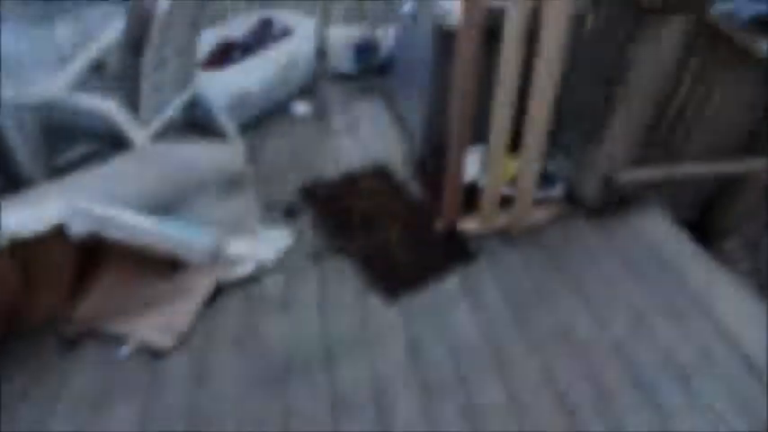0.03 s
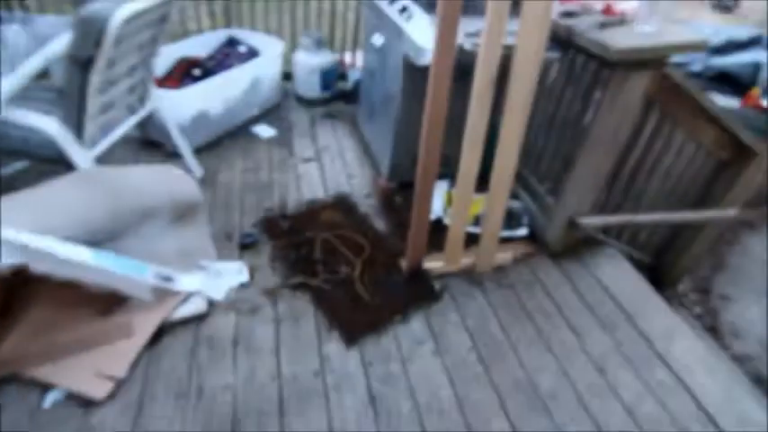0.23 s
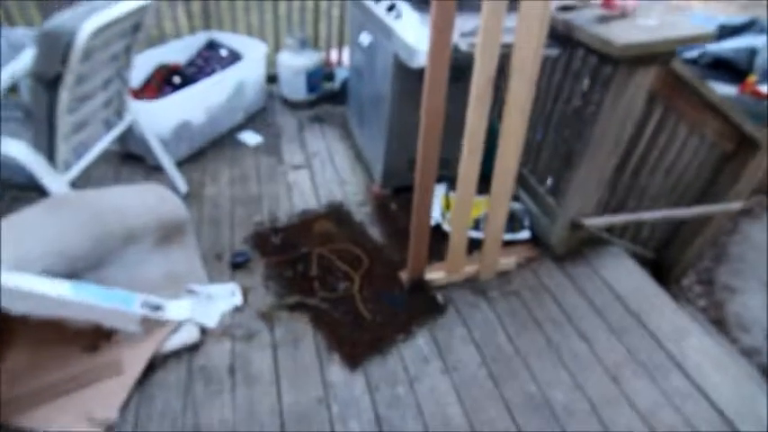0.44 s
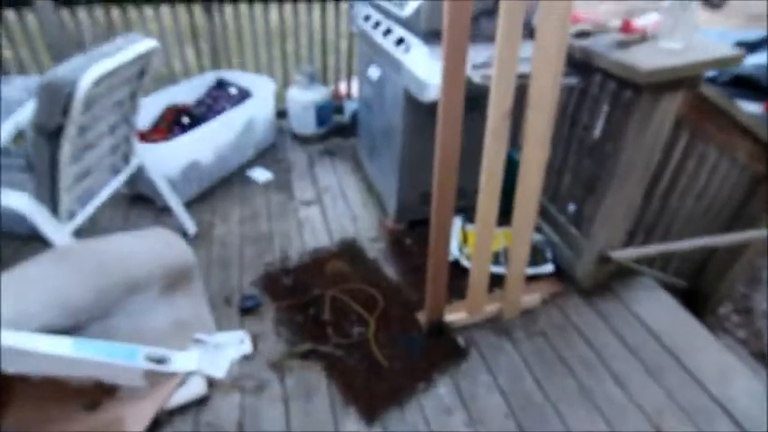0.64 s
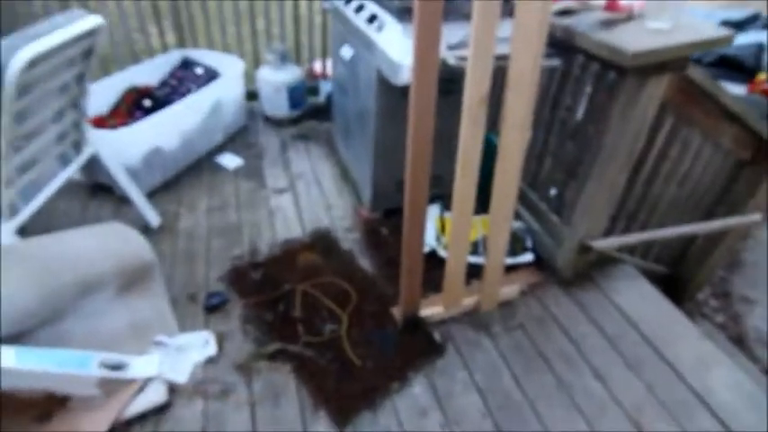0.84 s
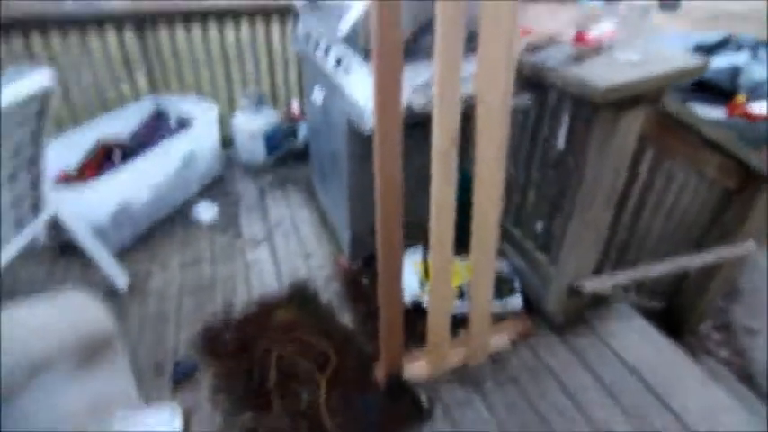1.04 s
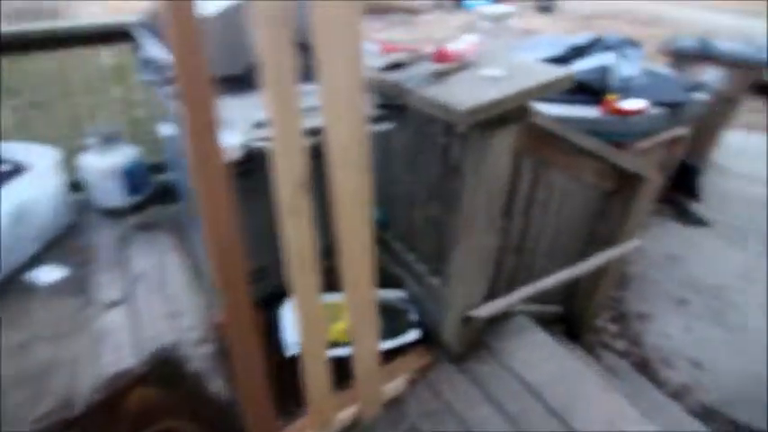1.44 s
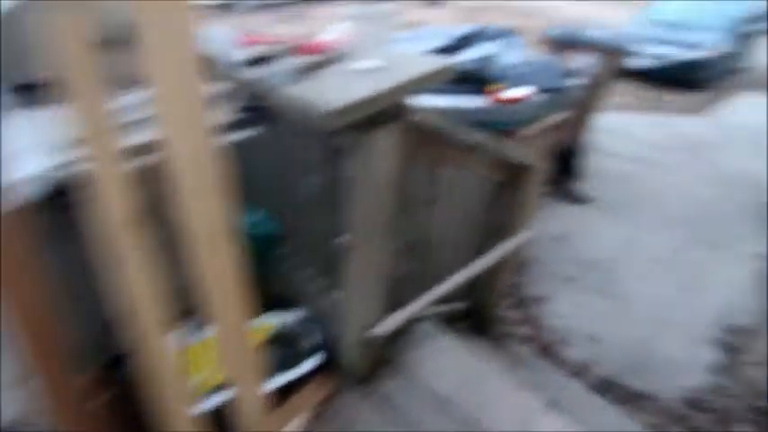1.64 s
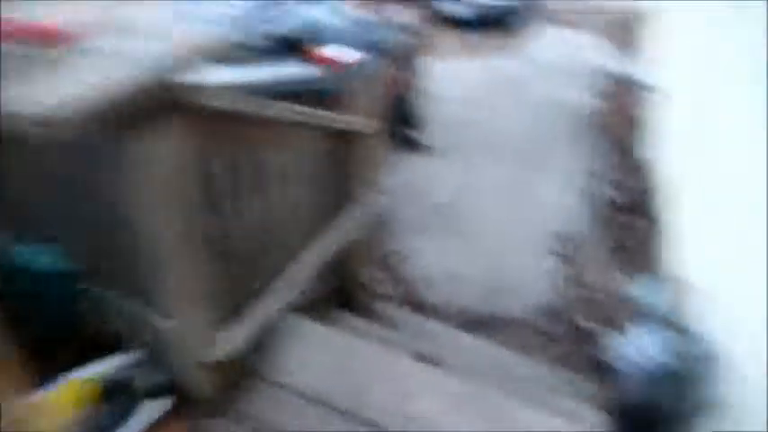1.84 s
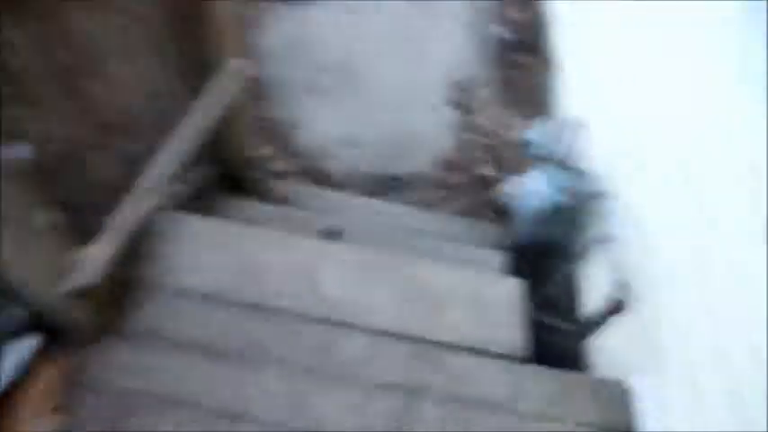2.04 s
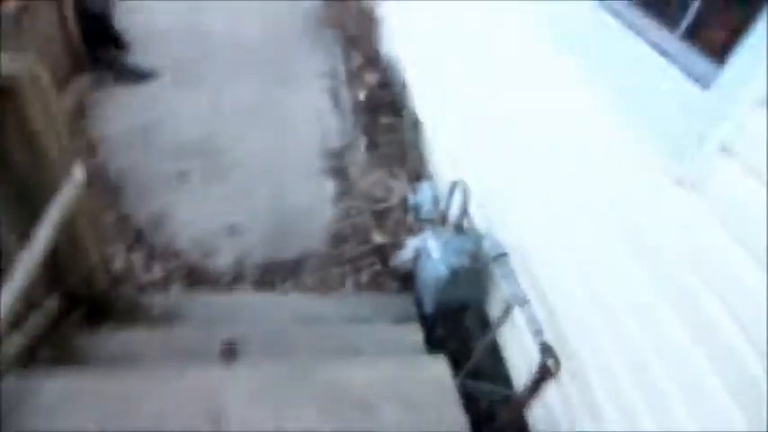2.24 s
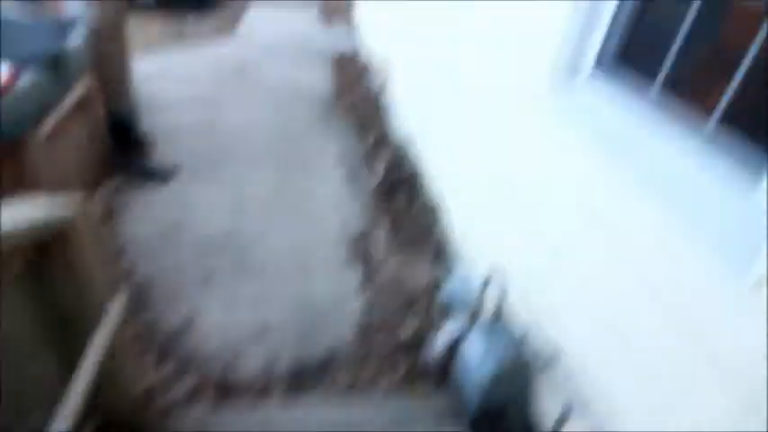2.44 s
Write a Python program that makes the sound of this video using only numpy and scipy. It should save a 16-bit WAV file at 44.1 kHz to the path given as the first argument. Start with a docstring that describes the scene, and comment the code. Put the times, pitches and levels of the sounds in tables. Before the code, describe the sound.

A gate's dry hinges squeal loudly, then it bangs shut as footsteps thud on wood.

```python
"""On an outdoor deck, a sprung wooden gate swings shut. Its dry hinges stick and slip, squealing against
each other, climbing in steps and then sinking in pitch until the gate slams on its post and rattles.
Feet thud on the boards, small things knock and clothing rustles close to the microphone,
all over a soft outdoor hush."""
import sys
import numpy as np
from scipy import signal
from scipy.fft import rfft, irfft
from scipy.io import wavfile

SR = 44100
rng = np.random.default_rng(int(sys.argv[2]) if len(sys.argv) > 2 else 0)


def store_pcm(level_fs):
    """Save levels as 16-bit WAV."""
    pcm = np.round(np.clip(level_fs, -1, 1) * 32767).astype(np.int16)
    wavfile.write(sys.argv[1], SR, np.atleast_2d(pcm).T)


N = 114660
T = np.arange(N) / SR
FREQS = np.arange(N // 2 + 1) * SR / N + 1
TOP_HZ = 15700
WAVER_HZ, SHIMMER_HZ = 43.7, 176  # slow and fast unevenness of a hinge's grip

# How unsteadily the hinges slip. Each row: time in seconds, roughness from 0 to 1.
ROUGHNESS = [(.3,0.4),(.38,0.24),(.54,0.24),(.6,0.59),(.72,0.47),(.85,0.19),(1.17,0.03),(1.22,0.67),(1.27,0.18),(1.34,0.72),(1.39,0)]
# The gate's wooden ring. Each row: pitch in Hz, relative level in dB, T60 in seconds before damping.
GATE_MODES = [(273,-8,0.074),(416,3,0.069),(703,3.5,0.055),(1118,-6,0.043),(1940,-7,0.029),(2500,-0.5,0.015),(3353,-9,0.1)]
# Edges in Hz of the boom, knock, clack and tick bands of a heavy blow.
BLOW_EDGES_HZ = [62, 200, 900, 3300, 7000]


def squeal(coupling_db=19):
    """Hinges and spring sing together and shake each other into sum and difference tones."""
    thin = thin_squeals()
    rich = main_hinge()
    low_cut = 1 / (1 + (2000 / FREQS) ** 4)
    coupled = irfft(rfft(rich * thin * curve(ROUGHNESS)) * low_cut, N)
    return place_squeal(rich + thin + amp(coupling_db) * coupled + creaks())


def main_hinge(tilt_db_per_khz=-3.2, pivot_khz=9.88):
    """The rich lead squeal of dry metal: three strong harmonics under a falling series of overtones."""
    # The climb, then the closing fall. Each row: time in seconds, pitch in Hz,
    # levels of harmonics 1, 2 and 3 in dB, overtone level at the pivot in dB.
    climbing = [(.3,1190,-25.5,-37,-55,-57),(.335,1223,-28.5,-36,-65,-59),(.36,1380,-28,-28,-20.5,-52),(.388,1417,-51.5,-29.5,-18.5,-47),(.435,1427,-35.5,-30,-26,-44.5),(.452,1512,-40,-32,-30,-45),(.5,1535,-43,-31,-27.5,-44),(.555,1595,-23,-23.5,-26.5,-42.5),(.585,1717,-27.5,-35.5,-44,-46),(.635,1763,-24.5,-31.5,-31,-48),(.69,1897,-41,-27,-38,-54),(.74,1873,-27,-27.5,-31.5,-48),(.778,1844,-35,-36,-34,-48),(.792,2105,-32.5,-22,-35.5,-45.5),(.87,2029,-34,-34,-37.5,-53),(.99,2044,-36.5,-56,-47,-55.5),(1.08,1966,-31,-27,-42.5,-50.5),(1.14,1939,-42,-37.5,-41,-56),(1.195,1981,-31,-33.5,-41,-49.5),(1.225,2123,-47,-64,-65,-62),(1.335,2104,-35.5,-43.5,-53,-53)]
    closing = [(1.349,1980,-25.5,-32,-39,-53),(1.365,1870,-32.5,-25,-31.5,-41),(1.41,1844,-37,-32,-43,-49.5),(1.44,1778,-24,-29.5,-28,-44.5),(1.505,1760,-37.5,-27,-34,-48),(1.55,1685,-31,-34,-32,-54.5),(1.61,1636,-37.5,-39.5,-52,-51),(1.648,1543,-43,-34.5,-28,-70)]
    out = 0
    for rows in (climbing, closing):
        khz = curve(rows) / 1000
        strong = [curve(rows, column) for column in (2, 3, 4)]
        overtones = [curve(rows, 5) + tilt_db_per_khz * (k * khz - pivot_khz) for k in range(4, 11)]
        out += stick_slip(rows, strong + overtones)
    return out


def thin_squeals(tilt_db_per_khz=-4.5):
    """Second hinge, pin and spring whistle: a strong fundamental with three fading harmonics above."""
    # Five squeals. Each row: time in seconds, pitch in Hz, levels of harmonics 1 and 2 in dB.
    second_hinge = [(.56,3154,-24,-29),(.59,2924,-26,-36),(.685,2876,-30,-43),(.72,3034,-26,-32.5),(.762,3064,-26,-35),(.785,3300,-28,-32)]
    second_high = [(.785,3690,-31,-36.5),(.87,3741,-31.5,-36),(.91,3600,-40.5,-56),(.93,3574,-22.5,-44),(1.02,3527,-18,-50),(1.16,3507,-27,-55),(1.21,3355,-24.5,-52),(1.26,3315,-48,-62)]
    second_closing = [(1.228,2682,-23.5,-37.5),(1.28,2580,-22,-30),(1.31,2535,-36.5,-37),(1.339,2452,-28.5,-48),(1.344,2380,-20,-32),(1.375,2440,-54,-69)]
    pin = [(.25,3756,-34,-48),(.31,3908,-23,-46),(.355,3970,-20.5,-37)]
    spring = [(.768,4110,-21.5,-57),(.82,4140,-37.5,-41),(1.02,4360,-37.5,-61)]
    out = 0
    for rows in (second_hinge, second_high, second_closing, pin, spring):
        khz = curve(rows) / 1000
        upper = [curve(rows, 3) + tilt_db_per_khz * k * khz for k in range(3)]
        out += stick_slip(rows, [curve(rows, 2)] + upper)
    return out


def stick_slip(rows, levels_db, flutter_db=5, shimmer_db=1.5, rasp_depth=0.5, rasp_hz=248):
    """Harmonics ride one uneven slip cycle; the grip flutters, and a rough contact shimmers and rasps."""
    hz, rough = curve(rows), curve(ROUGHNESS)
    phase = slip_phase(hz, rough)
    grip_db = flutter_db * rough * wander(WAVER_HZ)
    out = 0
    for k, db in enumerate(levels_db, 1):
        rasp = 1 + rasp_depth * rough ** 2 * wander(rasp_hz * k)
        level = amp(db + grip_db + shimmer_db * rough * wander(SHIMMER_HZ))
        out += level * rasp * np.sin(k * phase) * (k * hz < TOP_HZ)
    return np.sqrt(2) * out * window(rows[0][0], rows[-1][0], edge_s=0.0089)


def slip_phase(hz, rough, jitter=0.01365, jitter_hz=353, waver=0.00281):
    """Phase of the stick-slip cycle: the rougher the contact, the less even its periods."""
    bend = 1 + jitter * rough * wander(jitter_hz) + waver * wander(WAVER_HZ)
    return 2 * np.pi * np.cumsum(hz * bend) / SR


def creaks(flutter_db=3.5):
    """Short, low, ragged stick-slip glides as a hinge breaks loose."""
    # Each row: start and length in seconds, first and last pitch in Hz, level in dB, treble limit in Hz.
    glides = [(0.105,0.027,748,956,-32,3300),(.21,0.022,725.7,677,-23,10400),(0.213,0.039,1038,1416,-24,5570),(0.244,0.07,730,1237,-28,4740),(0.245,0.058,669,680,-29.5,2200),(0.614,0.11,1017,954,-32,5840)]
    # Tone of the hinge metal. Each row: frequency in Hz, gain in dB.
    metal = [(650,-1),(1300,-2.5),(1900,-8.5),(2700,-2),(4200,-3.5),(5400,-9.5),(15000,-29)]
    out = np.zeros(N)
    for start, length, first_hz, last_hz, db, limit_hz in glides:
        envelope = window(start, start + length, edge_s=0.0017)
        on = envelope > 0
        hz = np.interp(T, [start, start + length], [first_hz, last_hz])
        phase = slip_phase(hz, rough=0.78)[on]
        tone = 0
        for k in range(1, 20):
            partial_hz = k * hz[on]
            gain = colour(metal, partial_hz) / (1 + (partial_hz / limit_hz) ** 10)
            tone += gain * (partial_hz < TOP_HZ) * np.sin(k * phase + 2 * np.pi * rng.random())
        flutter = amp(flutter_db * wander(SHIMMER_HZ)[on])
        out[on] += amp(db) * unit(tone * flutter) * envelope[on]
    return out


def place_squeal(x, left_lag_s=4.3e-5, treble_left_db=4.5, treble_hz=5800):
    """Sets the squeal a little to the right in its reflections; the top overtones lean back leftward."""
    # Each row: time in seconds, left minus right in dB before the treble lean.
    balance = [(.2,-4),(1.1,-4.5),(1.45,-1)]
    left, right = x + reflections(x, t60_s=0.17, wet_db=-6)
    lean = amp(treble_left_db / 2 / (1 + (treble_hz / FREQS) ** 10))
    lag = np.exp(-2j * np.pi * FREQS * left_lag_s)
    left = irfft(rfft(left) * lean * lag, N)
    right = irfft(rfft(right) / lean, N)
    pan = amp(curve(balance) / 2)
    return np.array([left * pan, right / pan])


def slam(boom_db=-13):
    """The gate hits its post and rattles against it."""
    # Each row: start in seconds, relative levels of knock, clack and tick in dB.
    strikes = [(1.649,-8.5,-13,-19.5),(1.728,-19.5,-20.5,-32),(1.758,-21.5,-22.5,-28),(1.775,-16.5,-28,-35),(1.826,-29,-19,-37)]
    rows = [(at, knock + boom_db, knock, clack, tick) for at, knock, clack, tick in strikes]
    return blows(rows, GATE_MODES, BLOW_EDGES_HZ, crack_db=-13.5, damping=1.64, level_db=-4)


def footsteps(tick_db=-20):
    """Feet land and set the deck boards booming."""
    # Each row: start in seconds, relative levels of boom, knock and clack in dB.
    steps = [(1.102,-28.5,-16,-34),(1.785,-4.5,-6.5,-19),(2.282,-20,-19.5,-57),(2.299,-14.5,-23,-66)]
    # The boards' ring. Each row: pitch in Hz, relative level in dB, T60 in seconds before damping.
    deck_modes = [(95.7,-3.5,0.085),(129.7,-9,0.081),(177,-6.5,0.06),(271.8,5,0.07),(350,-8,0.083),(574,-6.5,0.096)]
    rows = [(at, boom, knock, clack, clack + tick_db) for at, boom, knock, clack in steps]
    return blows(rows, deck_modes, BLOW_EDGES_HZ, crack_db=-11, damping=1.03, level_db=-6.5)


def taps(boom_db=-13, tick_db=-20):
    """Small knocks and handling taps: a dry crack with a brief wooden ring."""
    # Each row: start in seconds, relative levels of knock and clack in dB.
    touches = [(0.659,-25.5,-60),(1.072,-23,-20.5),(1.601,-25,-29),(1.951,-22,-30),(2.1,-28.5,-24.5),(2.188,-30,-28.5),(2.214,-21,-28.5),(2.344,-46,-30.5),(2.422,-25,-20.5)]
    # Edges in Hz of a tap's boom, knock, clack and tick bands.
    edges_hz = [90, 200, 520, 2000, 5000]
    rows = [(at, knock + boom_db, knock, clack, clack + tick_db) for at, knock, clack in touches]
    return blows(rows, GATE_MODES, edges_hz, crack_db=2.5, damping=1.87, level_db=-8.5)


def blows(rows, modes, edges_hz, crack_db, damping, level_db, contact_db=4, contact_t60_s=0.038):
    """Each blow rings the wood's modes, with a noisy crack that dies sooner in the treble."""
    # T60 in seconds before damping of the noise in the boom, knock, clack and tick bands.
    band_t60_s = [0.76, 0.34, 0.084, 0.18]
    out = np.zeros((2, 2 * N))
    size = SR // 2
    t = T[:size]
    contact = amp(contact_db - 60 * t / contact_t60_s)
    for band, (lo, hi, t60) in enumerate(zip(edges_hz, edges_hz[1:], band_t60_s)):
        grit = stereo_noise(1 / np.sqrt((1 + (lo / FREQS) ** 10) * (1 + (FREQS / hi) ** 8)))
        crack_envelope = contact + amp(-60 * t * damping / t60)
        attack = 1 - np.exp(-t * hi * 1.1)
        for i, (at, *bands_db) in enumerate(rows):
            crack = np.roll(grit, i * N // len(rows), axis=1)[:, :size] * crack_envelope
            ring = 0
            for hz, db, mode_t60 in modes:
                if lo <= hz < hi:
                    detuned_hz = hz * (1 + 0.037 * rng.standard_normal())
                    ring += amp(db - 60 * t * damping / mode_t60) * np.sin(2 * np.pi * detuned_hz * t)
            hit = (ring + amp(crack_db) * unit_burst(crack)) * attack
            start = int(at * SR)
            out[:, start:start + size] += amp(bands_db[band] + level_db) * unit_burst(hit)
    return out[:, :N]


def clicks(t60_s=0.011):
    """Tiny hard contacts, each gone in a few milliseconds."""
    # Each row: start in seconds, level in dB, centre in Hz.
    contacts = [(1.807,-28,6150),(2.065,-41,5300),(2.207,-35,1080),(2.259,-33.5,3380)]
    out = 0
    for at, db, hz in contacts:
        envelope = amp(db - 60 * np.abs(T - at) / t60_s) * (T >= at)
        out += envelope * pink_band(hz, octaves=1)
    return out


def rustles(fall_ratio=2.08, grain_db=2.5, grain_hz=352):
    """Swells of fine, irregular contacts: loose fittings, soles and cloth."""
    # Each row: peak time in seconds, seconds to rise 20 dB, peak level in dB, centre in Hz.
    swells = [(0.066,0.033,-40.5,440),(1.105,0.053,-43,5030),(1.676,0.21,-31.5,2460),(1.763,0.061,-23,895),(1.998,0.033,-35,2687),(2.15,0.042,-41,2350),(2.521,0.041,-34,1350),(2.589,0.1,-41,2620)]
    out = 0
    for at, rise, db, hz in swells:
        from_peak = np.maximum((at - T) / rise, (T - at) / rise / fall_ratio)
        envelope = amp(db - 20 * from_peak.clip(0, 10))
        grain = amp(grain_db * wander(grain_hz))
        out += envelope * unit(grain * pink_band(hz, octaves=1.32))
    return out


def reflections(x, t60_s, wet_db, low_cut_hz=220):
    """Sound scattered back from the boards, railings and house wall, starting 3 ms late."""
    scatter = stereo_noise(FREQS ** 2 / (FREQS ** 2 + low_cut_hz ** 2), side_hz=2000)
    tail = scatter * amp(-60 * T / t60_s) * (T > .003)
    tail = tail[:, :N // 3] / np.sqrt(np.sum(tail ** 2) / 2)
    return amp(wet_db) * signal.fftconvolve(x[None], tail, axes=1)[:, :N]


def air(flicker_db=3, flicker_hz=6.7):
    """A gently flickering bed of outdoor hush and faint handling noise."""
    # Each row: frequency in Hz, relative noise density in dB.
    spectrum = [(25,-14.5),(128,-3),(280,-5.5),(850,-10.5),(1400,-16.5),(3000,-18),(15000,-43)]
    # Each row: time in seconds, level in dB.
    fader = [(0,-51),(.06,-47.5),(.9,-46),(1.15,-45),(1.95,-40.5),(2.25,-45.5),(2.6,-42)]
    return stereo_noise(colour(spectrum, FREQS)) * amp(curve(fader) - flicker_db * wander(flicker_hz))


def amp(db):
    """Decibels to gain."""
    return 10 ** (np.asarray(db) / 20)


def unit(x):
    """Scale to rms 1."""
    return x / (np.std(x) + 1e-12)


def unit_burst(x):
    """Scale a stereo hit to the energy of 10 ms at rms 1."""
    return x / np.sqrt(np.sum(x ** 2) / (2 * (SR // 100)))


def curve(rows, column=1):
    """A column of a table, joined by straight lines in time."""
    rows = np.array(rows)
    return np.interp(T, rows[:, 0], rows[:, column])


def colour(rows, hz):
    """Gain of a (Hz, dB) spectrum at the given frequencies."""
    rows = np.array(rows)
    return amp(np.interp(np.log(hz), np.log(rows[:, 0]), rows[:, 1]))


def window(start, end, edge_s):
    """Fade in at start and out at end."""
    return np.clip((T - start) / edge_s + .5, 0, 1) * np.clip((end - T) / edge_s + .5, 0, 1)


def noise(gain):
    """Noise of rms 1 with the given spectrum."""
    return unit(irfft(rfft(rng.standard_normal(N)) * gain, N))


def wander(hz):
    """Random drift, mostly slower than hz."""
    return noise(1 / (1 + (FREQS / hz) ** 2))


def stereo_noise(gain, side_hz=3500):
    """Noise that is centred in the bass and wide in the treble."""
    mid = noise(gain)
    side = irfft(rfft(noise(gain)) * np.clip(FREQS / side_hz, .05, 1), N)
    return np.array([mid + side, mid - side])


def pink_band(hz, octaves):
    """Stereo pink noise reaching the given octaves either side of hz."""
    return stereo_noise(1 / (1 + (np.log2(FREQS / hz) / octaves) ** 4) / np.sqrt(FREQS))


def scene():
    """Squeal, slam, steps and small noises over the outdoor air."""
    hits = slam() + footsteps() + taps()
    hinges = squeal()
    hit_tails = reflections(hits.mean(axis=0), t60_s=0.18, wet_db=-7)
    return hinges + hits + hit_tails + clicks() + rustles() + air()


def record(dry):
    """Clip at full scale and cut the top treble steeply."""
    high_cut = signal.ellip(10, .2, 80, TOP_HZ, fs=SR, output="sos")
    return signal.sosfilt(high_cut, np.clip(dry, -1, 1))


dry = scene()
out = record(dry)
store_pcm(out)
```